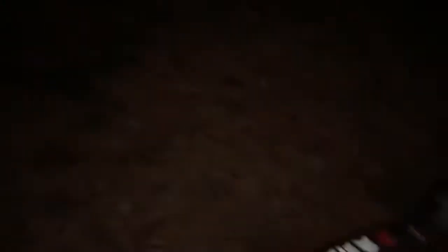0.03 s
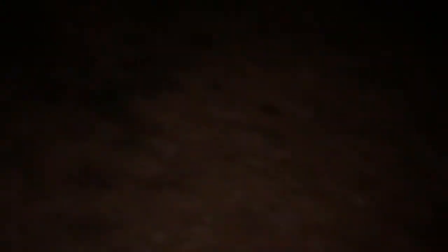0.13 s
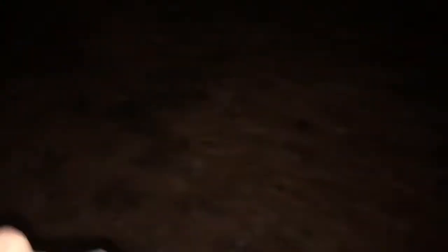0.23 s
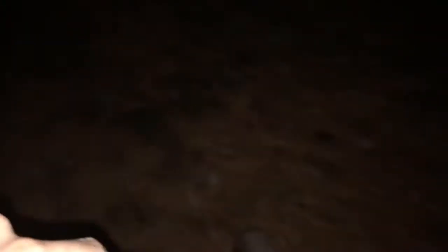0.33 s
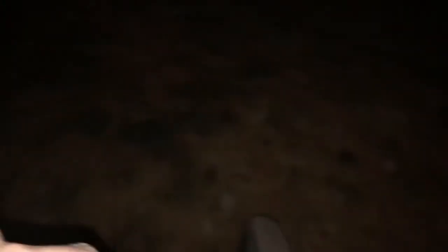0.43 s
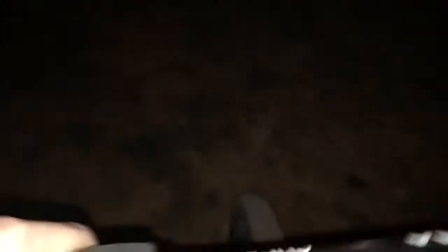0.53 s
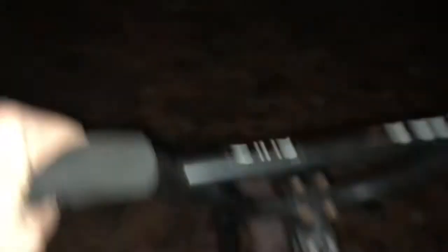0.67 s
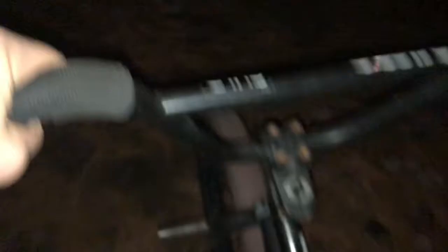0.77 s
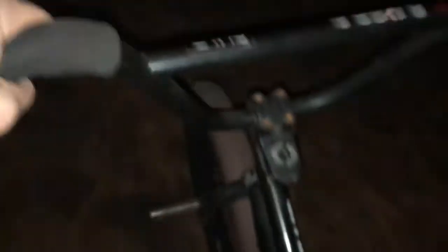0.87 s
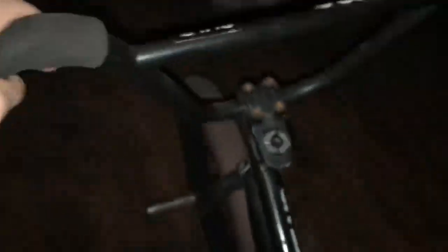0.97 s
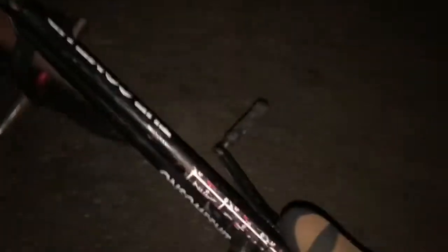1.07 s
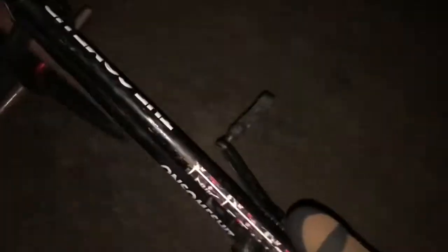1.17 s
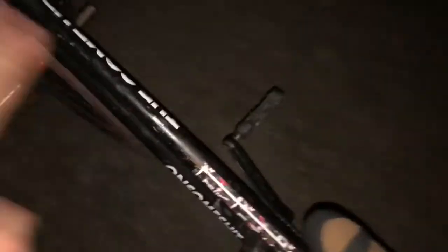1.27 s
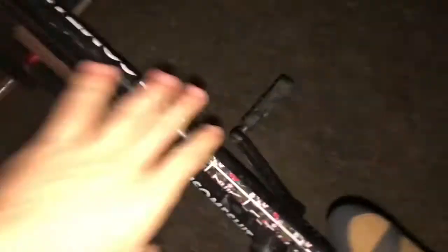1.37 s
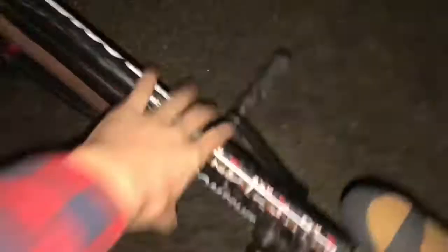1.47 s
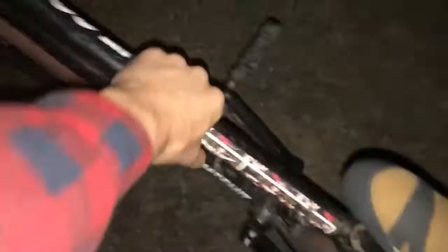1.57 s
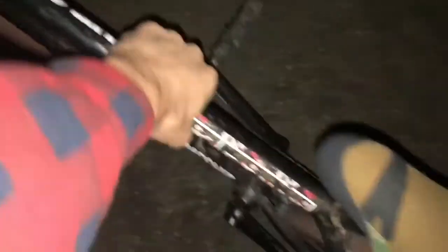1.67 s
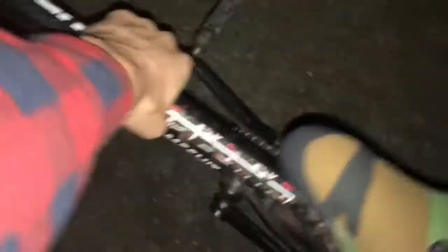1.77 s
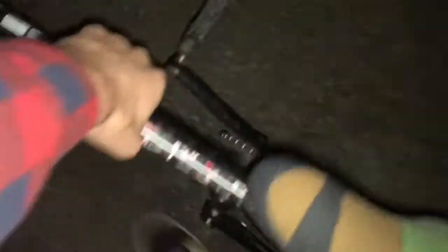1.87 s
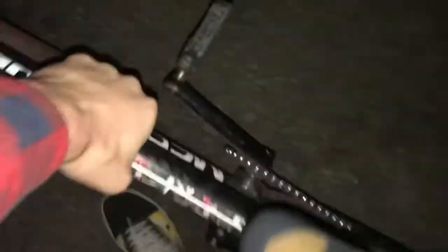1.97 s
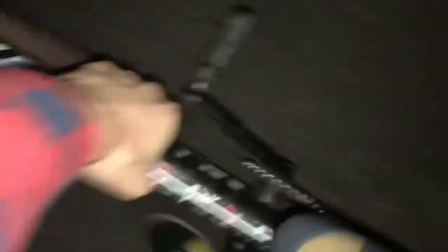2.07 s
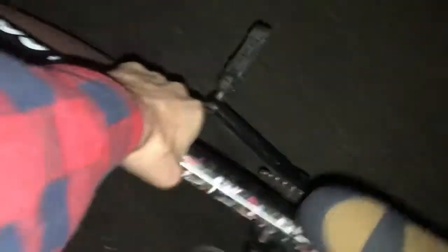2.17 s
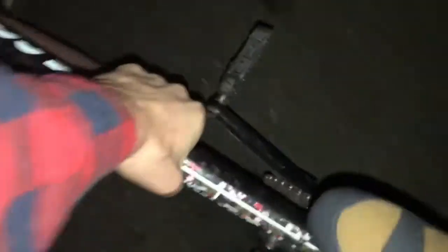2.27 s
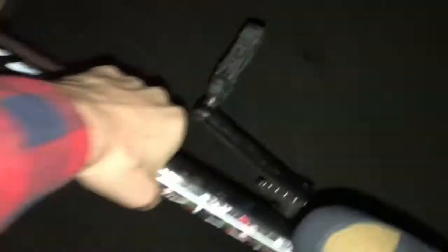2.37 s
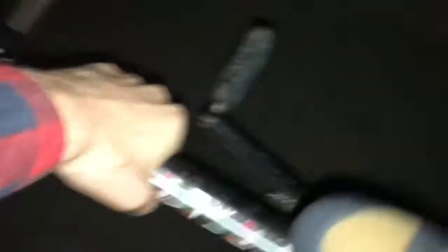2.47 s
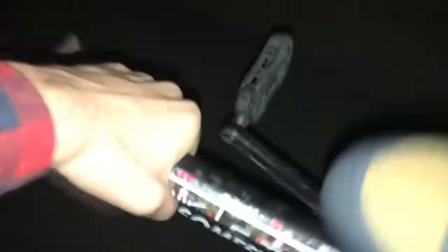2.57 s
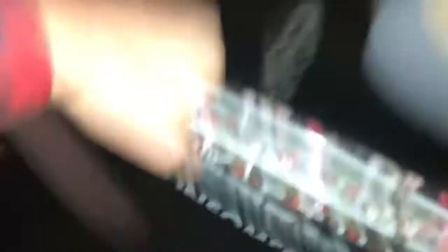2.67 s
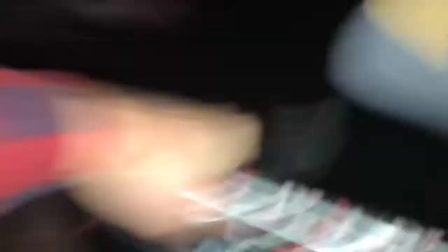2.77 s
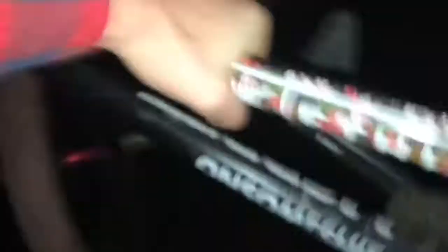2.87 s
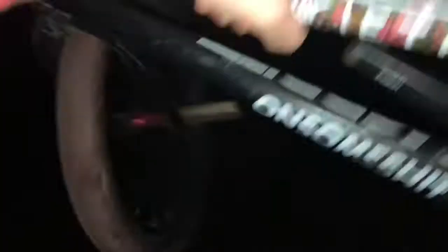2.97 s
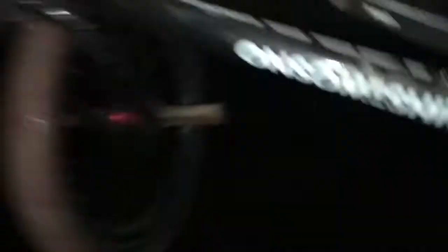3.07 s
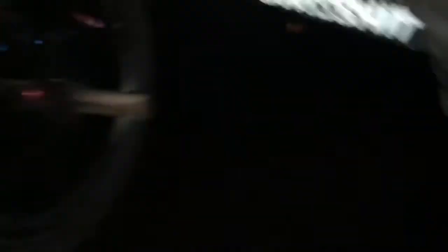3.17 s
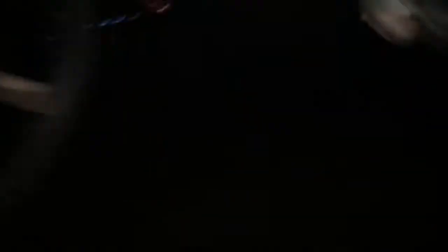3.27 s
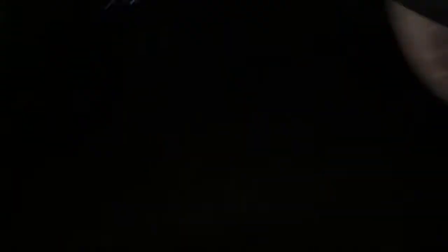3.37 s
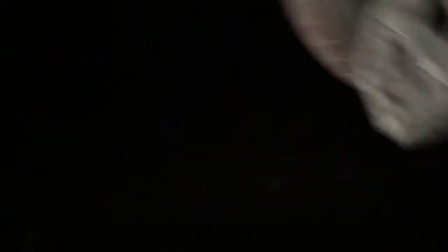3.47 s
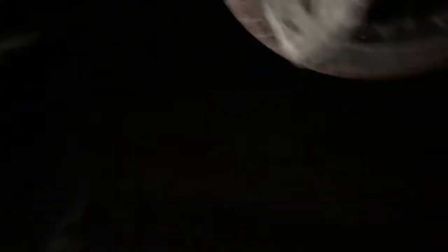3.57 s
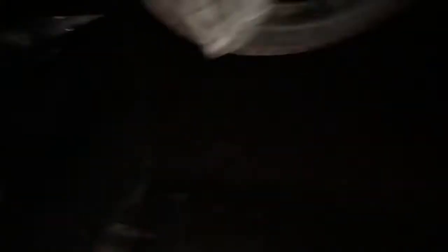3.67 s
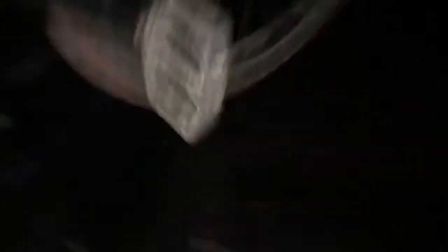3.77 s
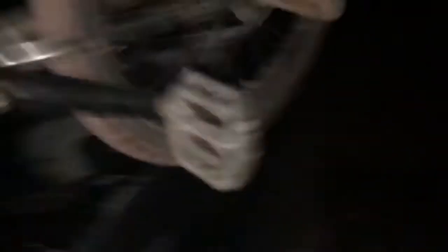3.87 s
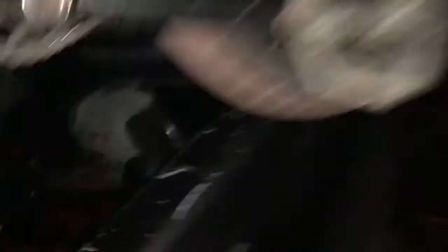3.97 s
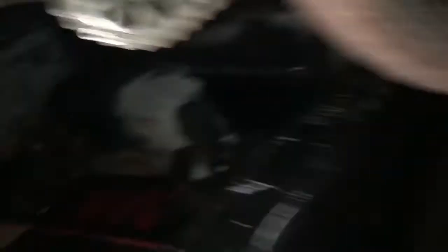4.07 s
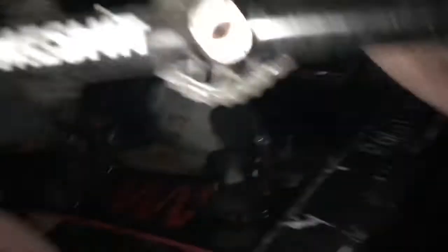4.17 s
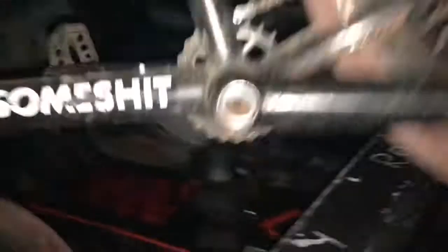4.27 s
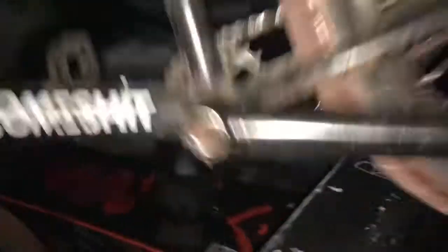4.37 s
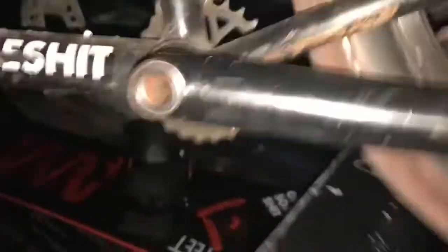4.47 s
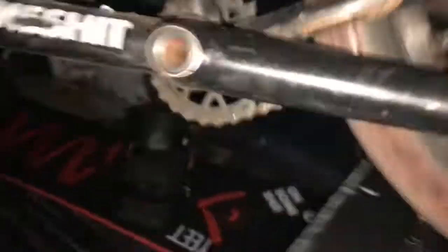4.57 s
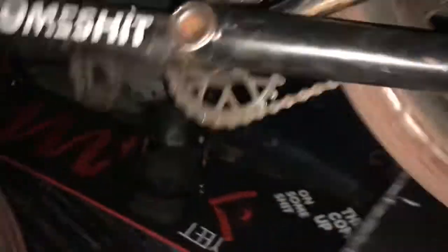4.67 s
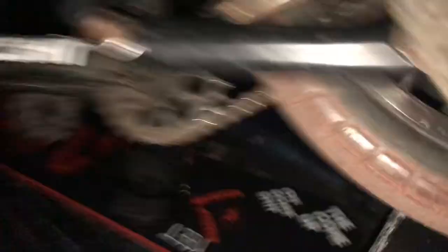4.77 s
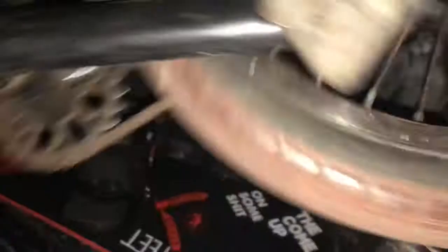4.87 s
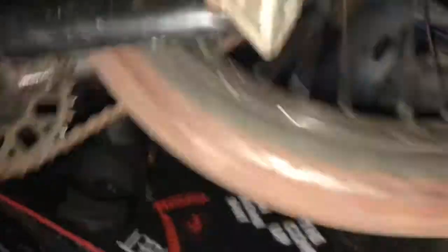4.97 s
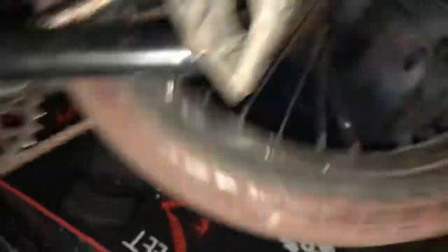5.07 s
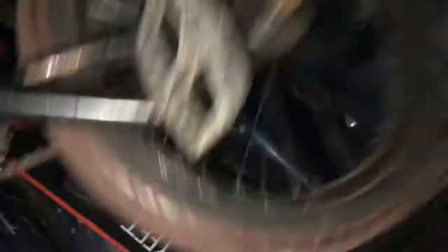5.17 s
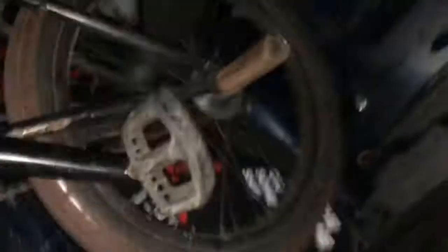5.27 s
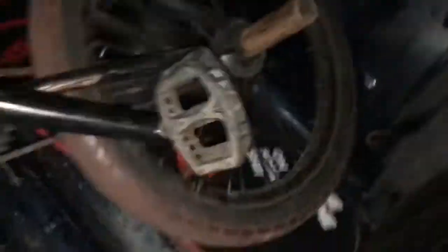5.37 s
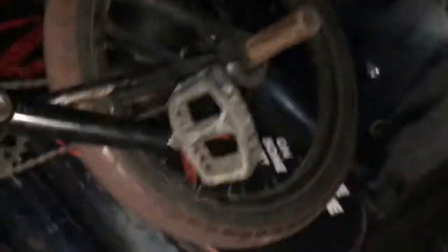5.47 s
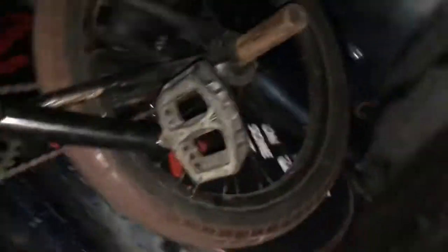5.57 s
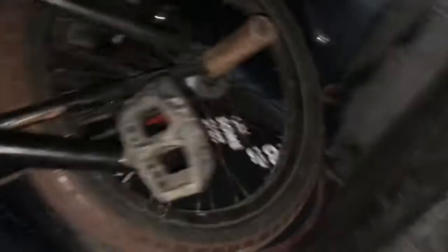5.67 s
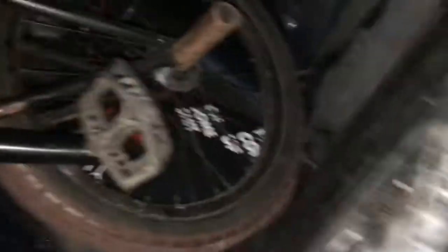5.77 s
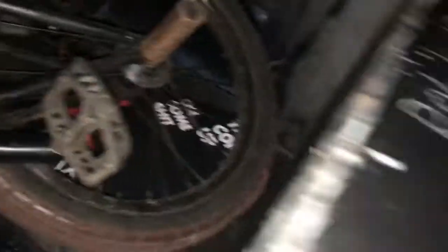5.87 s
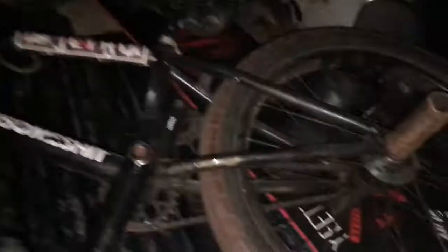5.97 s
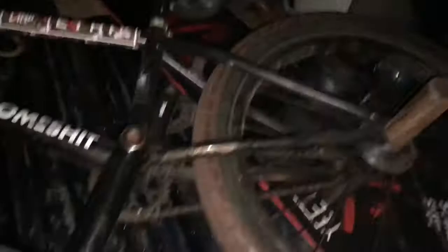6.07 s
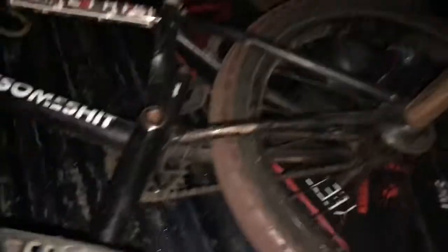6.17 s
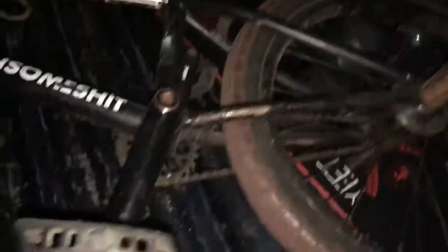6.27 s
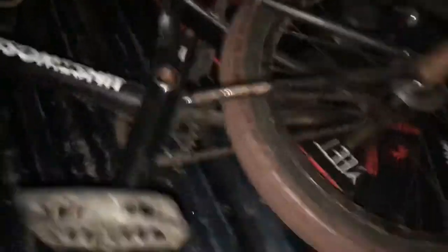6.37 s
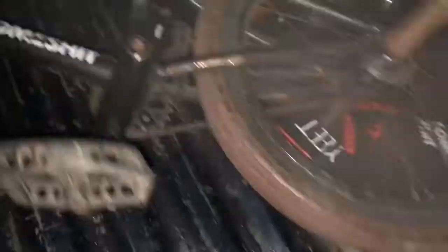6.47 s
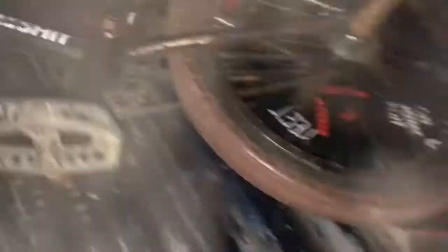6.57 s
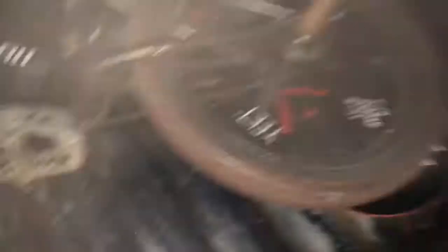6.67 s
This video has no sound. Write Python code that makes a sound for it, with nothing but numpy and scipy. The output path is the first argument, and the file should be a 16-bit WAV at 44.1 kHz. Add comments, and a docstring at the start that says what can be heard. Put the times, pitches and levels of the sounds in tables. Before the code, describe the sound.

Rapid clean metallic clicks from a bicycle hub, ringing slightly, over quiet low night air, with shoes and hands bumping softly. Then abrupt, much louder clatter: the bike knocks and scrapes across a thin hollow metal vehicle bed, panels booming, chain rattling, small parts tinkling. It stops briefly, almost silent, and ends in another few heavy knocks. Everything is near the microphone.

```python
"""First a quick metallic ticking: a small steel bicycle is carried with its rear wheel spinning.
Each hub tick is a short noise burst with decaying tones; hands and shoes bump (low tones) and scuff (noise).
Then the bicycle is dragged over a hollow sheet-metal cargo floor: grainy noise shakes resonant panels,
so they boom and rattle, and separate knocks crack and ring. Quiet air lies underneath.
The level dips briefly twice, and the microphone limits the peaks."""
import sys
import numpy as np
from scipy import signal
from scipy.fft import rfft, irfft
from scipy.io import wavfile
from scipy.ndimage import uniform_filter1d, minimum_filter1d

SR = 44100
rng = np.random.default_rng(int(sys.argv[2]) if len(sys.argv) > 2 else 0)


def inscribe(sig):
    """Save sig as 16-bit PCM at rate SR to the path in sys.argv[1].

    A 1-D sig is mono; a 2-D sig holds one channel per row.
    Samples are clipped to [-1, 1] before scaling.
    """
    pcm = np.round(np.clip(np.atleast_2d(sig).T, -1, 1) * 32767)
    wavfile.write(sys.argv[1], SR, pcm.astype(np.int16))


N = 295778  # length in samples

# How the ticks change as the wheel swings about:
# (t/s, tick level/dB, treble level/dB added, shell ring level/dB added)
WHEEL_SWING = [(0.1, -23.5, -6, -17), (.45, -22.5, -11, -5), (.65, -20.5, -9, -11), (1.1, -20, -10.5, -20),
               (1.5, -19.5, -5, -16), (2, -19.5, -11.5, -22.5), (2.9, -18, -10, -15), (3.3, -15.5, -3, -23),
               (3.95, -15.5, 0, -19), (4.15, -22.5, 2, -22), (4.4, -31, -3, -30)]
# Clicks off the beat: (t/s, level/dB)
STRAY_CLICKS = [(2.105, -40), (2.206, -28.5), (2.5736, -38), (2.7558, -14), (2.879, -35)]
# Tone colour of the pawl's snap: (f/Hz, level/dB)
SNAP_COLOUR = [(350, -58), (600, -27), (1870, -11), (3900, -0.5), (5590, -11.5), (6610, -9.5), (10300, 0.5),
               (15200, -1.5), (16500, -28)]
# Tone colour of the wheel singing on after a tick: (f/Hz, level/dB)
WHEEL_COLOUR = [(900, -42), (1650, -9), (2300, 4.5), (2800, 4), (3700, -4), (5200, 1), (7300, -21),
                (10800, -41), (16500, -32)]
# Tones of hub, spokes and frame tubes: (f/Hz, level/dB, t60/s)
HUB_TONES = [(1970, -20, 0.013), (2280, -43, 0.06), (2865, -39, 0.13), (2834, -16.5, 0.039),
             (5920, -19, 0.057), (6400, -23.5, 0.063), (6890, -10, 0.011), (8480, -24.5, 0.065),
             (11300, -36, 0.033), (11400, -26.5, 0.069), (11800, -23, 0.041), (13200, -20, 0.048),
             (15000, -10, 0.027)]
# Long tones of the hub shell: (f/Hz, level/dB, t60/s)
SHELL_TONES = [(3863, -4.5, 0.11), (3896, -11, 0.06)]
# Long tones of the spokes: (f/Hz, level/dB, t60/s)
SPOKE_RING_TONES = [(2703, -24, 0.052), (3054, -29.5, 0.15), (3450, -22.5, 0.039), (4104, -24, 0.063),
                    (4837, -16, 0.025)]
TICK_SPREAD_DB, RING_SPREAD_DB = 1.1, 3  # chance differences from tick to tick


def hub():
    """Each pawl snaps over a tooth: a short bright burst, the wheel's faint tail, and ringing steel."""
    out, t = np.zeros(N), np.arange(8192) / SR
    bands = np.geomspace(1500, 16000, num=12)
    at, level, treble, ring = np.transpose(WHEEL_SWING)
    ticks = [(s, np.interp(s, at, level) + TICK_SPREAD_DB * rng.standard_normal()) for s in tick_times()]
    for s, db in ticks + STRAY_CLICKS:
        treble_db = np.interp(s, at, treble)
        colour = [(f, d + treble_db * (f > 7000)) for f, d in SNAP_COLOUR]
        snap = coloured(rng.standard_normal(len(t)), colour)
        # every tick gets its own slight colour
        snap = coloured(snap, np.c_[bands, 2.5 * rng.standard_normal(len(bands))])
        burst = gain_of(-6) * fading(t, 0.02, 0.0019) + gain_of(-19.5) * fading(t, 0.091, 0.0066)
        tail = coloured(rng.standard_normal(len(t)), WHEEL_COLOUR) * fading(t, 0.18, 0.0045)
        shell = gain_of(np.interp(s, at, ring)) * ringing(t, SHELL_TONES, RING_SPREAD_DB)
        spoke_ring = ringing(t, SPOKE_RING_TONES, RING_SPREAD_DB)
        steel = gain_of(-4.5) * ringing(t, HUB_TONES, 3.2)
        tick = snap * burst + gain_of(-34.5) * tail + shell + spoke_ring + steel
        add(out, s - .001, gain_of(db) * tick)
    return out


# Wheel speed: (t/s, teeth per second)
WHEEL_SPEED = [(0.0, 5.96), (0.3, 14.51), (0.54, 21.83), (0.83, 26.77), (1.05, 23.85), (1.07, 4.91),
               (1.2, 9.69), (1.55, 11.6), (1.72, 12.37), (2.01, 6.4), (2.25, 12.36), (2.69, 10.94),
               (3.19, 15.5), (3.44, 15.4), (3.73, 12.61), (3.95, 9.44), (4.11, 17.9), (4.4, 20.05)]


def tick_times():
    """A pawl drops each time the wheel has turned one more tooth."""
    s, per_s = np.transpose(WHEEL_SPEED)
    t = np.arange(0, s[-1], 1 / SR)
    teeth = np.cumsum(np.interp(t, s, per_s)) / SR
    return np.interp(np.arange(1, teeth[-1]), teeth, t)


# When a small loose steel part pings: (t/s, level/dB)
PING_EVENT = (2.207, -25)
# Its tones: (f/Hz, level/dB, t60/s)
PING_TONES = [(4800, -9, .07), (11130, 0, .1), (14970, -14, .12)]


def ping():
    """A small loose steel part is struck once and its tones die away."""
    out, t = np.zeros(N), np.arange(8192) / SR
    s, db = PING_EVENT
    add(out, s, gain_of(db) * ringing(t, PING_TONES, 0))
    return out


# Strength of the rim's sound: (t/s, level/dB)
RIM_LEVEL = [(1.08, -62), (1.6, -59), (1.9, -63), (2.36, -58), (2.6, -60), (3.3, -58), (3.41, -51),
             (3.6, -52), (3.72, -58), (3.95, -59)]
# Resonances of the rim: (f/Hz, width/Hz, level/dB)
RIM_RESONANCES = [(4150, 30, 0), (2250, 350, -9), (2780, 30, -9), (3090, 30, -11), (5850, 40, -9),
                  (6900, 20, -15), (8150, 20, -12)]


def rim():
    """The rim sings faintly: steady noise excites its resonances."""
    return level_curve(RIM_LEVEL) * panels(rng.standard_normal(N), RIM_RESONANCES)


# Dull bumps of hands, shoes and tyre: (t/s, level/dB, f/Hz)
BUMP_EVENTS = [(.008, -33, 193), (0.029, -31, 110), (0.134, -38, 79), (0.362, -46.5, 340),
               (0.468, -43.5, 330), (0.507, -41, 101), (0.984, -42, 318), (1.313, -45, 704),
               (1.415, -34.5, 415), (1.513, -46, 880), (1.547, -31, 562), (1.561, -37, 548),
               (1.874, -50, 300), (2.053, -30, 397), (2.077, -32.5, 890), (2.102, -38, 199),
               (2.264, -41, 320), (2.289, -46, 327), (2.584, -44, 290), (2.756, -28.5, 202),
               (2.775, -31, 70.6), (2.8, -29.5, 252), (2.822, -22.5, 228), (2.88, -32.5, 89),
               (3.041, -39.5, 720), (3.279, -41, 107), (3.544, -40.5, 604), (3.575, -21.5, 786)]
BUMP_T60_S, BUMP_SLOPE = 0.062, 0.19  # t60 at 400 Hz; lower bumps ring longer
BUMP_SAG, BUMP_SAG_S = 0.584, 0.0059  # a bump starts this share higher and sags to its pitch


def bumps():
    """Soft bumps: each is a short ring, sagging in pitch, with a puff of noise."""
    out, t = np.zeros(N), np.arange(8192) / SR
    for s, db, hz in BUMP_EVENTS:
        t60 = BUMP_T60_S * (400 / hz) ** BUMP_SLOPE
        puff_colour = [(hz / 4, -40), (hz / 1.65, 0), (hz * 1.27, -4), (hz * 6, -30), (16000, -60)]
        puff = coloured(rng.standard_normal(len(t)), puff_colour)
        sagging_t = t + BUMP_SAG * BUMP_SAG_S * (1 - np.exp(-t / BUMP_SAG_S))
        tone = np.sin(2 * np.pi * hz * sagging_t)
        add(out, s, gain_of(db) * fading(t, t60, 0.00068) * (0.6 * tone + 0.72 * puff))
    return out


# Scuffs of shoes and hands on the frame, timed at their loudest: (t/s, level/dB)
SCUFF_EVENTS = [(0, -58), (.5, -45.5), (.8, -50), (.97, -49.5), (1.58, -44.5), (1.66, -51), (1.972, -42),
                (2.01, -61), (2.08, -52.5), (2.269, -45), (2.778, -41), (3.06, -55), (3.578, -40),
                (6.151, -51), (6.25, -54.5), (6.31, -49.5)]
# Steady rubbing under the scuffs: (t/s, level/dB)
RUBBING_LEVEL = [(0, -60), (1.04, -52), (1.1, -62), (2.6, -72)]
# Tone colour of both: (f/Hz, level/dB)
SCUFF_COLOUR = [(240, -57), (400, -15), (831, -3), (2430, -4.5), (2630, -6.5), (5910, -7.5), (15300, -16),
                (16500, -37)]
SCUFF_RISE, SCUFF_FALL = 580, 360  # dB per s


def scuffs():
    """Rough surfaces catch and slip: grainy noise swells up and dies away."""
    rub = swells(*np.transpose(SCUFF_EVENTS), SCUFF_RISE, SCUFF_FALL) + level_curve(RUBBING_LEVEL)
    return rub * coloured(grainy(500, 3, .004), SCUFF_COLOUR)


# Shoves over the floor, timed at their loudest:
# (t/s, deep boom level/dB, thudding level/dB, scraping hiss level/dB)
SHOVE_EVENTS = [(3.969, -34, -18.5, -53), (4.021, -19, -7.5, -16.5), (4.26, -38, -27.5, -55),
                (4.41, -34, -19, -51), (4.468, -19, -10, -27.5), (4.64, -31, -24, -48),
                (4.738, -28, -18, -58), (4.902, -30, -26.5, -33.5), (5.018, -8, -9, -23.5),
                (5.131, -13.5, -11.5, -22.5), (5.222, -20.5, -15.5, -28), (5.36, -22, -17, -23),
                (5.4, -10, -7, -28.5), (5.51, -18, -13.5, -60), (5.58, -10.5, -14, -53),
                (5.715, -19, -10.5, -33), (5.749, -22, -7.5, -67), (5.808, -13, -42, -63.5),
                (6.06, -54, -48, -70), (6.2, -41, -38.5, -70), (6.34, -31, -39, -63),
                (6.478, -22, -17.5, -33.5), (6.558, -21, -15, -23.5), (6.71, -22, -7, -59)]
# Gain of the dragging sounds: silent before the floor is touched, quieter in the pause: (t/s, level/dB)
DRAGGING_LEVEL = [(3.953, -60), (3.958, 0), (5.92, 0), (6.0, -9), (6.37, -9), (6.42, 0), (6.8, 0)]
# Deepest resonances of the floor panels: (f/Hz, width/Hz, level/dB)
DEEP_PANELS = [(60.8, 18.7, -2), (77.5, 7.7, -7)]
# Low panel resonances: (f/Hz, width/Hz, level/dB)
BOOM_PANELS = [(123, 12, -4), (139.3, 36.6, -1.5), (178.5, 30, -9.5), (222.4, 16.7, 0.5), (271.5, 14, -4.5)]
# Higher panel resonances: (f/Hz, width/Hz, level/dB)
CLATTER_PANELS = [(370, 74, -4.5), (484, 112, 4), (615, 180, -4.5), (733, 110, 4.5), (912, 120, 4.5),
                  (1076, 170, 2.5), (1233, 12, -8), (1321, 100, -2.5), (1680, 40, -40), (2402, 49, -8)]
# Tone colour of the scraping: (f/Hz, level/dB)
SCRAPE_COLOUR = [(900, -30), (1500, -2), (3000, -0.5), (8000, -9), (16000, -8.5)]
# Resonances of the rattling chain: (f/Hz, width/Hz, level/dB)
CHAIN_RESONANCES = [(1390, 150, 15), (2350, 280, -14.5), (3930, 400, -19)]
BOOM_RISE, BOOM_FALL, THUD_RISE, THUD_FALL = 550, 77, 800, 98.7  # dB per s
HISS_RISE, HISS_FALL, SLIDE_FALL, CHAIN_FALL = 240, 170, 17, 30  # dB per s
CLATTER_DB = -16.5  # clatter relative to the boom
SLIDE_DB, CHAIN_DB = -38, -20.5  # soft trailing hiss and chain, relative to the hiss


def cargo_floor():
    """Dragging shakes the floor panels and scrapes them; knocks crack and leave them clattering."""
    at, boom_db, thud_db, hiss_db = np.transpose(SHOVE_EVENTS)
    knocking, blows = knocks()

    deep = swells(at, boom_db, BOOM_RISE, BOOM_FALL)
    deep_shake = deep * panels(panels(grainy(66, 0.49, 0.036), DEEP_PANELS), DEEP_PANELS)
    thud = swells(at, thud_db, THUD_RISE, THUD_FALL)
    thud_shake = thud * panels(grainy(64, 0.62, 0.0098), BOOM_PANELS)

    clatter = swells(at, boom_db + CLATTER_DB, THUD_RISE, THUD_FALL)
    chatter_colour = [(200, 13.5), (400, 0.5), (2000, -5.5), (5000, -12.5)]
    chatter = coloured(grainy(170, 4.05, 0.0084), chatter_colour)
    rattle = (clatter + gain_of(-5) * blows) * panels(chatter, CLATTER_PANELS)

    hiss = swells(at, hiss_db, HISS_RISE, HISS_FALL)
    hiss = hiss + swells(at, hiss_db + SLIDE_DB, HISS_RISE, SLIDE_FALL)  # trails off softly
    scrape = hiss * coloured(grainy(700, 5, .003), SCRAPE_COLOUR)

    # the chain rattles on after each shove
    chain = swells(at, hiss_db + CHAIN_DB, HISS_RISE, CHAIN_FALL)
    chain = chain * panels(grainy(300, 3, .004), CHAIN_RESONANCES)

    dragged = deep_shake + thud_shake + rattle + scrape + chain
    return dragged * level_curve(DRAGGING_LEVEL) + knocking


# Knocks against the floor:
# (t/s, crack level/dB, clatter level/dB added to it, treble level/dB added to it)
KNOCK_EVENTS = [(3.954, -19, -0.5, -22), (3.988, 0, -3.5, -1.5), (4.0286, -6.5, -5, 6),
                (4.115, -13.5, -5.5, -5), (4.39, -21.5, -2, -15), (4.4154, -15.5, -9, -19),
                (4.4418, -11.5, 1.5, 3), (4.4746, -10.5, -33, -5), (4.5222, -9, -21, -4.5),
                (4.5606, -21, -31, -9), (4.6933, -18.5, -4, -4.5), (4.7172, -25.5, 8, 0),
                (4.7744, -21, -32, -5), (4.929, -20, -1, -14), (4.995, -1.5, 0, -5),
                (5.021, 0.5, -4.5, -12), (5.059, -23, -18, -9), (5.1136, -24, 12, -24),
                (5.172, -0.5, 0, -15), (5.2047, -13, 9, -18), (5.309, -25.5, 10.5, -26),
                (5.3422, -5.5, 4, -14), (5.3596, -11, 7, -13), (5.436, -8.5, -16, -12),
                (5.4596, -3, 3, -19), (5.5264, -8.5, 2.5, -19), (5.5682, -13.5, 3, -28),
                (5.7024, -9, 7.5, -17), (5.7481, -12.5, 2, -28), (5.7771, -7.5, 7, -38),
                (5.881, -48, -1.5, -19), (6.408, -29, -6, -7), (6.5032, -15, -10.5, -2),
                (6.5371, -10, 2.5, -3), (6.585, -20, -29, 4), (6.6299, -9.5, -4, -19),
                (6.6825, -25.5, 16, -29), (6.695, -23, 11, -31)]
# Tone colour of a crack's body: (f/Hz, level/dB)
CRACK_COLOUR = [(900, -29), (1400, 0), (3000, -8), (5500, -6.5), (7000, -19.5)]
# Tone colour of a crack's treble: (f/Hz, level/dB)
EDGE_COLOUR = [(5000, -34), (6500, 11), (11000, 8.5), (16000, -2)]
KNOCK_T60_S, JANGLE_T60_S = 0.11, 0.2  # the crack's slower part; the clatter after a knock
THUMP_DB, THUMP_T60_S = -16, 0.053  # each knock also strikes the low panels


def knocks():
    """Each knock gives a noisy crack, a falling chirp and panel rings; also returns the clatter's gain."""
    cracks, edges, blows, rings = np.zeros((4, N))
    t = np.arange(8192) / SR
    struck = [(hz, db, 2.2 / width) for hz, width, db in CLATTER_PANELS]
    thumped = [(hz, db, THUMP_T60_S) for hz, _, db in BOOM_PANELS]
    # bending waves in sheet metal carry the treble fastest: a falling chirp opens each knock
    chirp_hz = 700 + 4500 * np.exp(-t / 0.00155)
    chirp = fading(t, 0.012, 0.00066) * np.sin(2 * np.pi * np.cumsum(chirp_hz) / SR)
    fall = fading(t, .022, .0003) + gain_of(-6) * fading(t, KNOCK_T60_S, .002)
    jangle = fading(t, JANGLE_T60_S, 0.0017)
    for s, db, clatter_db, treble_db in KNOCK_EVENTS:
        ring_db = db + clatter_db
        add(cracks, s, gain_of(db) * fall)
        add(edges, s, gain_of(db + treble_db) * fall)
        add(blows, s, gain_of(ring_db) * jangle)
        add(rings, s, gain_of(ring_db - 12) * (ringing(t, struck, 4) + 3 * chirp))
        add(rings, s, gain_of(ring_db + THUMP_DB) * ringing(t, thumped, 2.1))
    grit = grainy(600, 2, .0015)
    cracking = cracks * coloured(grit, CRACK_COLOUR) + edges * coloured(grit, EDGE_COLOUR)
    return rings + gain_of(-7.0) * cracking, blows


# Tinkling of small metal parts: (t/s, level/dB, f/Hz)
TINKLE_EVENTS = [(4.854, -26.5, 2300), (4.909, -24.5, 4000), (5.315, -22, 2340), (5.88, -41, 6300)]


def tinkles():
    """Small metal parts tinkle: two close tones that die away quickly."""
    out, t = np.zeros(N), np.arange(8192) / SR
    for s, db, hz in TINKLE_EVENTS:
        add(out, s, gain_of(db) * ringing(t, [(hz, 0, .05), (1.03 * hz, -4, .04)], 0))
    return out


# Spokes ring on faintly in the pause: (t/s, level/dB)
SPOKE_LEVEL = [(6.02, -85), (6.14, -72), (6.2, -61), (6.27, -74.5), (6.31, -59), (6.4, -83)]
# Their tones: (f/Hz, level/dB)
SPOKE_PITCHES = [(6300, -1.5), (8550, -9)]


def spokes():
    """Two thin, wavering high tones: noise through very narrow resonances."""
    resonances = [(hz, 14, db) for hz, db in SPOKE_PITCHES]
    return level_curve(SPOKE_LEVEL) * panels(rng.standard_normal(N), resonances)


# Tone colour of the air: (f/Hz, level/dB)
AIR_COLOUR = [(30, -43), (60, -0.5), (110, 0.5), (200, -7), (260, 0), (330, -9), (600, -13), (1600, -31),
              (2500, -39), (4000, -52), (16000, -33)]


def air():
    """Quiet air: uneven noise, mostly low."""
    return gain_of(-56.5) * coloured(grainy(40, 3, .02), AIR_COLOUR)


def gain_of(db):
    """Decibels to amplitude."""
    return 10 ** (np.asarray(db) / 20)


def evened(x):
    """Scales to an average strength (rms) of 1."""
    return x / np.sqrt(np.mean(x ** 2) + 1e-20)


def level_curve(rows):
    """Gain over time from (t/s, level/dB) rows; practically silent outside them."""
    s, db = np.transpose(rows)
    return gain_of(np.interp(np.arange(N) / SR, s, db, -150, -150))


def add(mix, s, sound):
    """Mixes a sound in at s seconds."""
    part = mix[round(s * SR):][:len(sound)]
    part += sound[:len(part)]


def coloured(x, points):
    """Shapes the spectrum of x by (f/Hz, level/dB) points, then scales to rms 1."""
    f, db = np.transpose(points)
    hz = np.fft.rfftfreq(len(x), 1 / SR)
    shape = gain_of(np.interp(np.log(hz + 1), np.log(f + 1), db))
    return evened(irfft(rfft(x) * shape, len(x)))


def panels(x, modes):
    """A bank of two-pole resonances, each swinging at its own pitch; scaled to rms 1."""
    out = np.zeros(len(x))
    for hz, width, db in modes:
        out += gain_of(db) * signal.lfilter(*signal.iirpeak(hz, hz / width, SR), x)
    return evened(out)


def grainy(per_s, spread_db, grain_s):
    """Noise in bursts of very unequal size, as loose parts chatter."""
    starts = rng.random(N) < per_s / SR
    size = gain_of(spread_db * np.minimum(rng.exponential(1, N), 4)) * starts
    fall = np.exp(-1 / (grain_s * SR))
    power = signal.lfilter([1], [1, -fall], size ** 2) + 0.13  # a little noise remains between bursts
    return evened(np.sqrt(power) * rng.standard_normal(N))


def fading(t, t60, rise_s):
    """Quick rise, then a fall of 60 dB in t60 seconds."""
    return (1 - np.exp(-t / rise_s)) * gain_of(-60 * t / t60)


def ringing(t, modes, spread_db):
    """Decaying tones; each blow lands elsewhere, so their strengths and pitches vary."""
    hz, db, t60 = np.transpose(modes)[:, :, None]
    chance = rng.standard_normal((2, len(hz), 1))
    strength = gain_of(db + spread_db * chance[0])
    pitch = hz * (1 + 0.0058 * chance[1])
    return (strength * fading(t, t60, .0007) * np.sin(2 * np.pi * pitch * t)).sum(0)


def swells(times, dbs, rise, fall):
    """Gain of overlapping swells that climb to their peak and sink again at steady dB per second."""
    grid = np.arange(0, N + 64, 64)  # worked out every 64 samples, then joined by lines
    after = grid / SR - np.array(times)[:, None]
    power = gain_of(np.array(dbs)[:, None] + np.minimum(rise * after, -fall * after)) ** 2
    return np.interp(np.arange(N), grid, np.sqrt(power.sum(0)))


def scene():
    """All sources, from the ticking wheel to the quiet air."""
    bicycle = hub() + ping() + rim()
    handling = bumps() + scuffs()
    floor = cargo_floor() + tinkles()
    return (bicycle + handling + floor + spokes() + air())[None]


# All sound dips briefly: (t/s, level/dB at the deepest point)
LEVEL_DIPS = [(1.064, -17), (6.007, -34)]
DIP_S = .026  # half the length of a dip
EDGE_HZ = 16200  # upper band limit


def record(dry):
    """Brief dips, the microphone's bass roll-off, a fast peak limiter, then the band limit."""
    t = np.arange(N) / SR
    dip_db = sum(db * np.maximum(1 - abs(t - s) / DIP_S, 0) for s, db in LEVEL_DIPS)
    dipped = dry * gain_of(dip_db)
    thin = signal.sosfilt(signal.butter(4, 47, "highpass", fs=SR, output="sos"), dipped)
    allowed = np.minimum(1, .95 / (abs(thin) + 1e-9))
    # hold the lowest allowed gain over 10 ms, then smooth it over 5 ms
    limited = thin * uniform_filter1d(minimum_filter1d(allowed, size=441), size=221)
    band_limit = signal.firwin(511, EDGE_HZ, window=("kaiser", 9), fs=SR)
    return signal.oaconvolve(limited, band_limit[None], "same")


dry = scene()
out = record(dry)
inscribe(out)
```